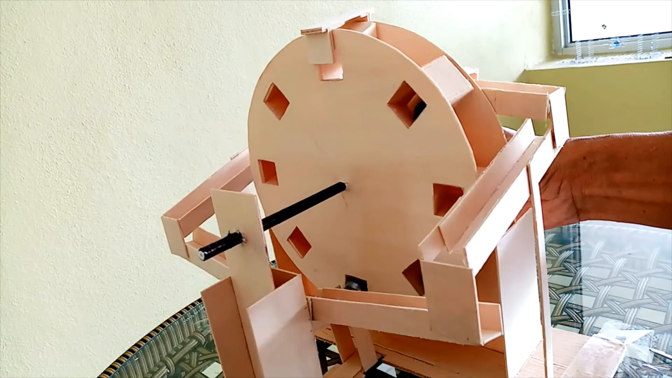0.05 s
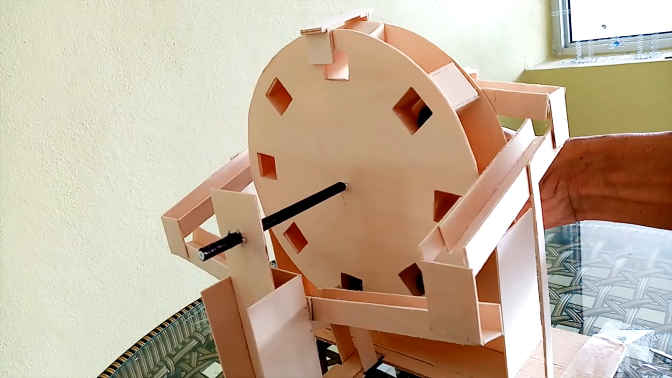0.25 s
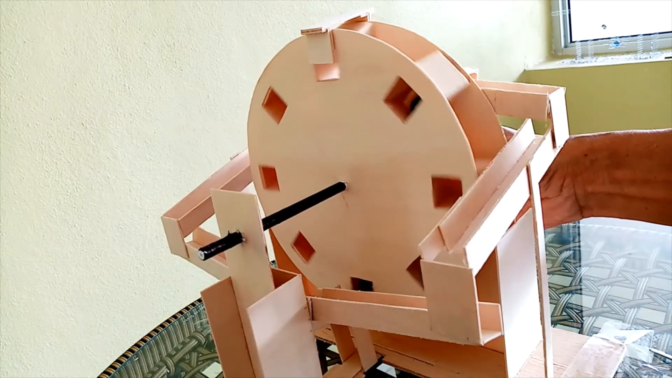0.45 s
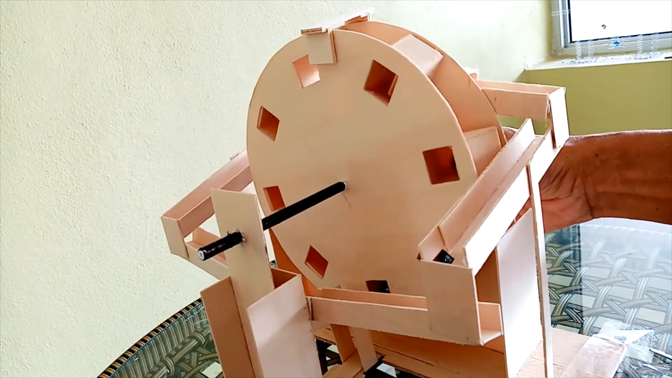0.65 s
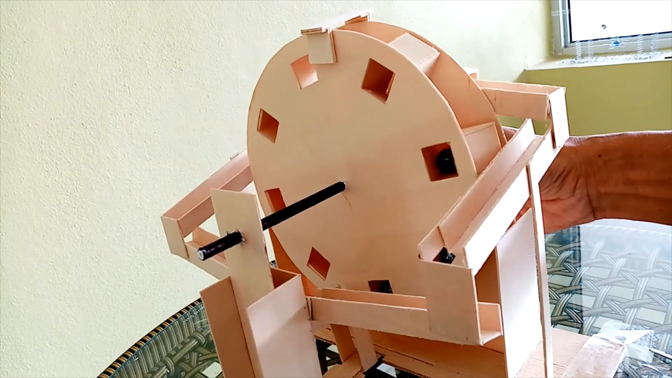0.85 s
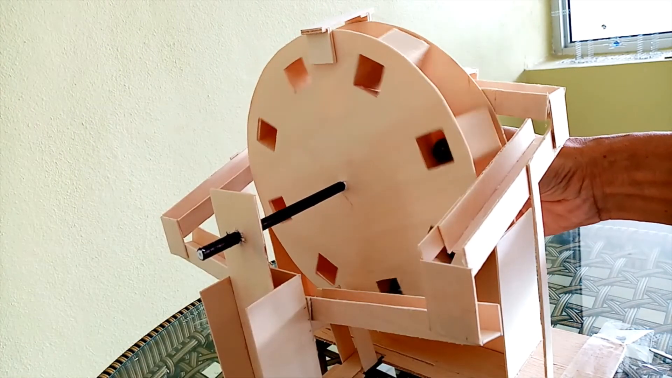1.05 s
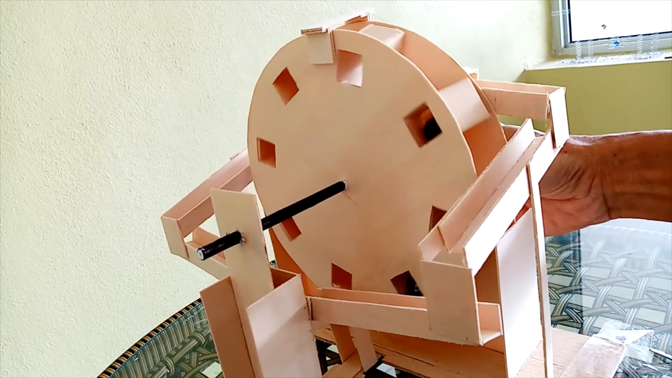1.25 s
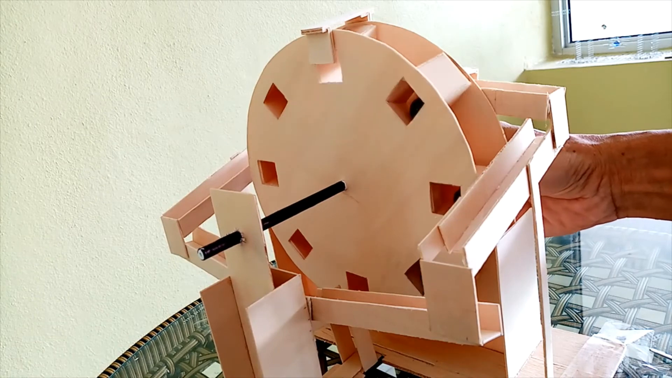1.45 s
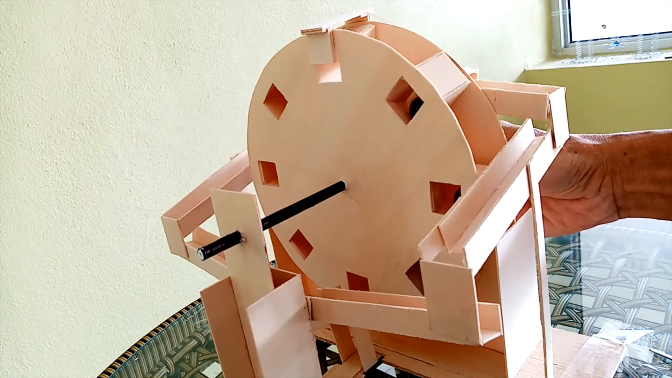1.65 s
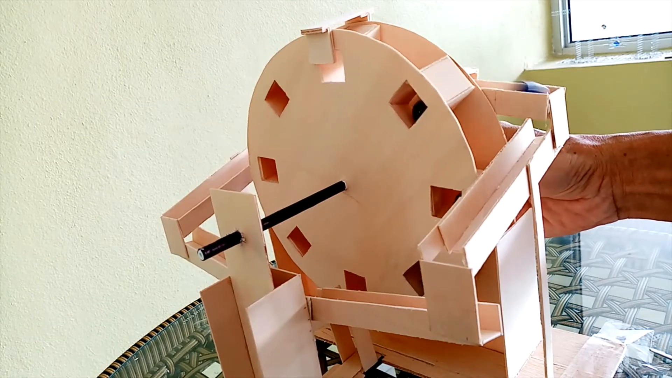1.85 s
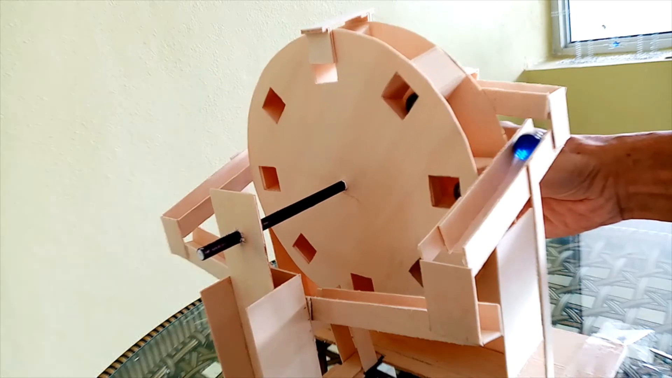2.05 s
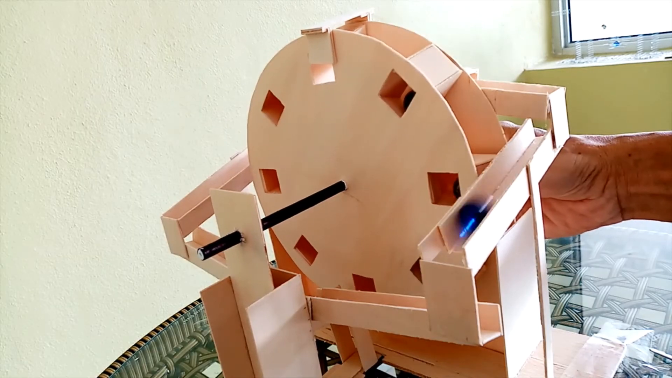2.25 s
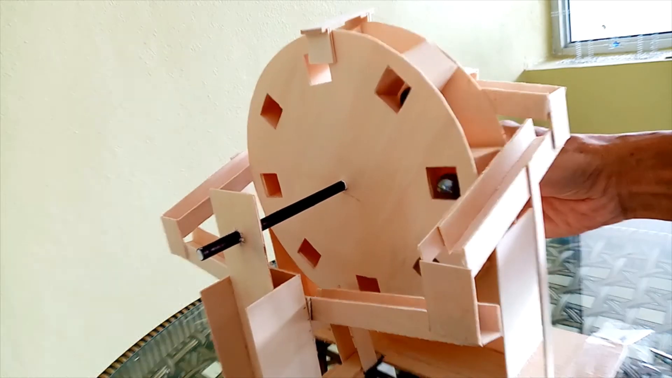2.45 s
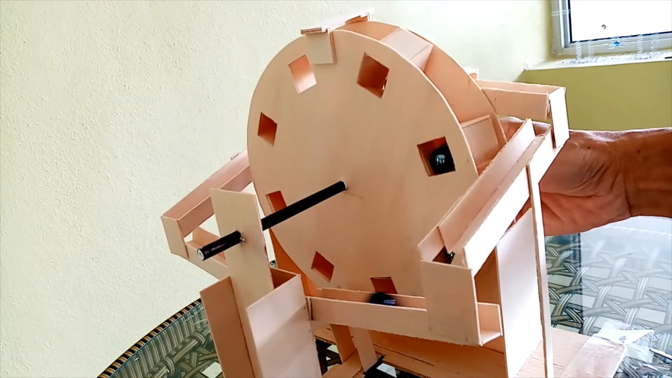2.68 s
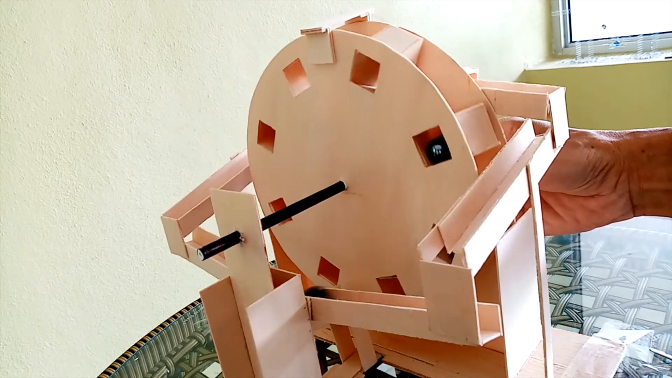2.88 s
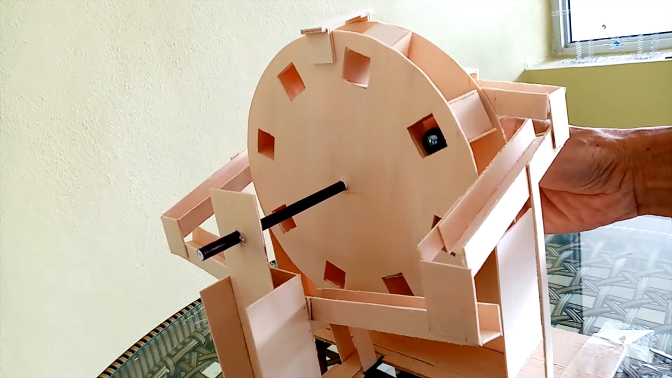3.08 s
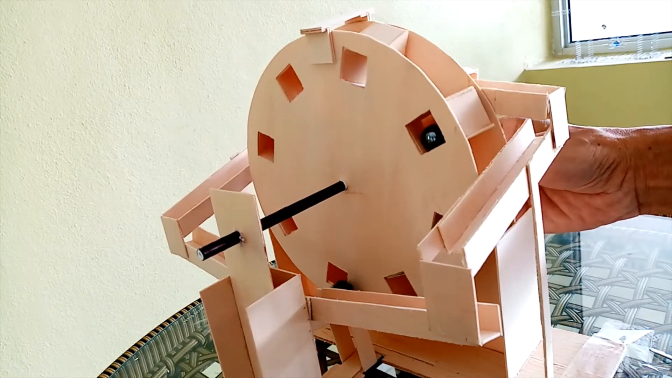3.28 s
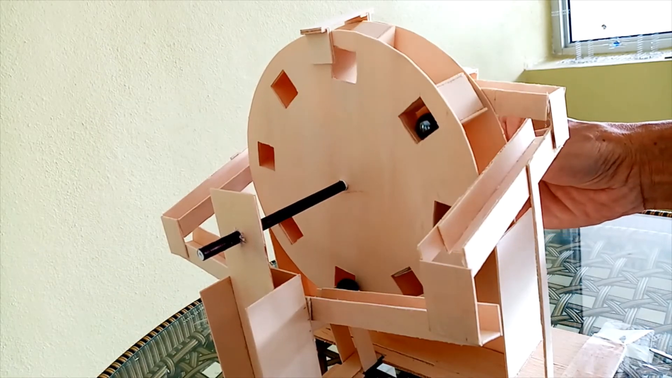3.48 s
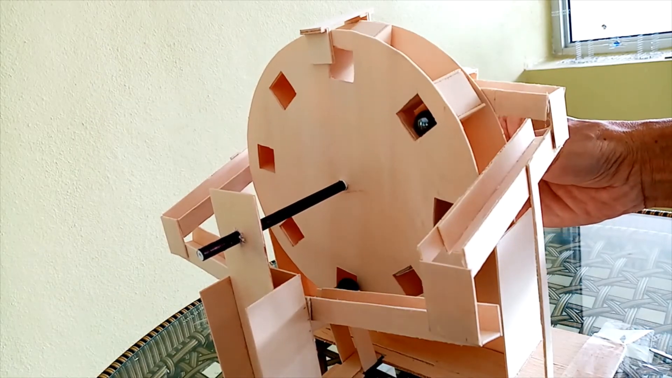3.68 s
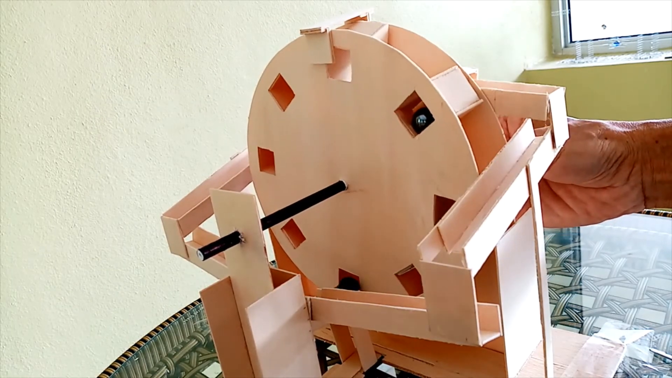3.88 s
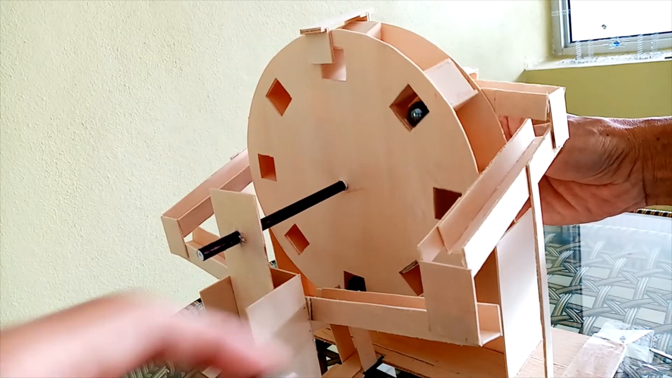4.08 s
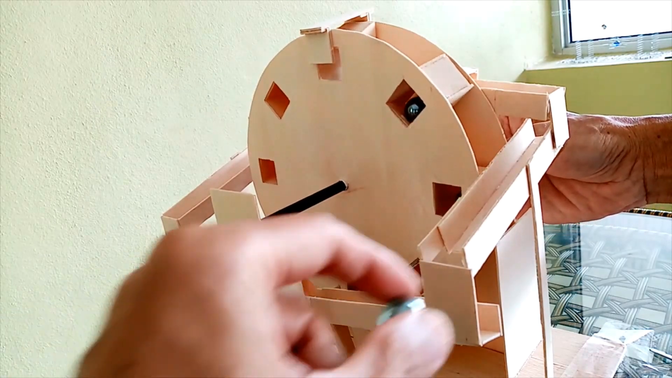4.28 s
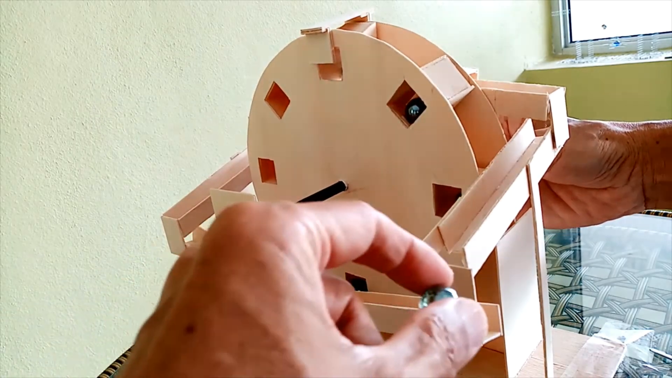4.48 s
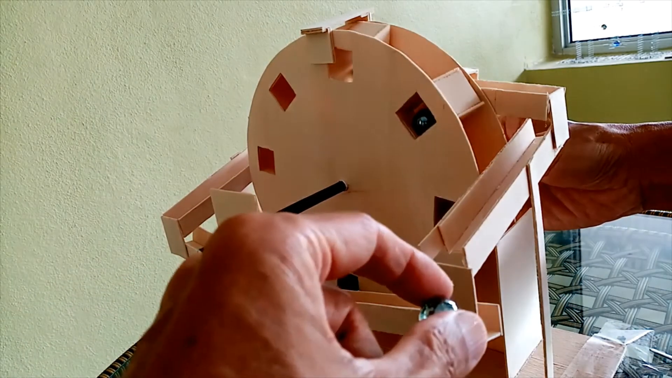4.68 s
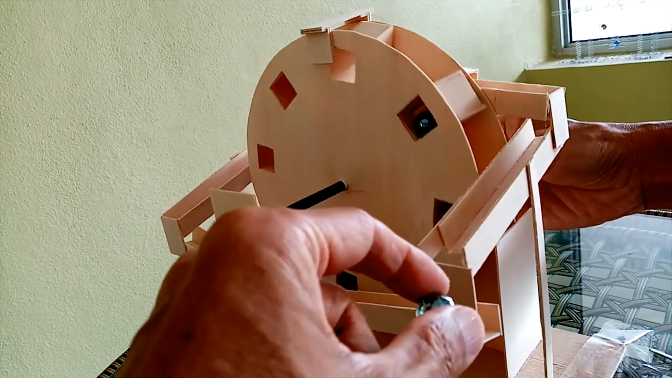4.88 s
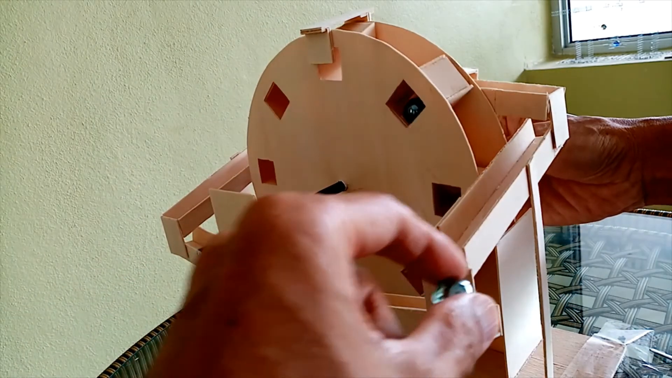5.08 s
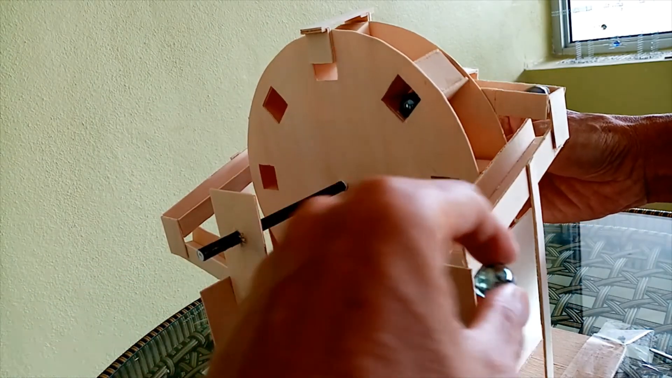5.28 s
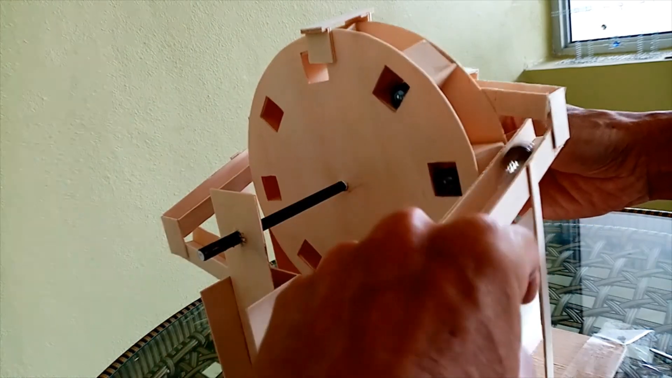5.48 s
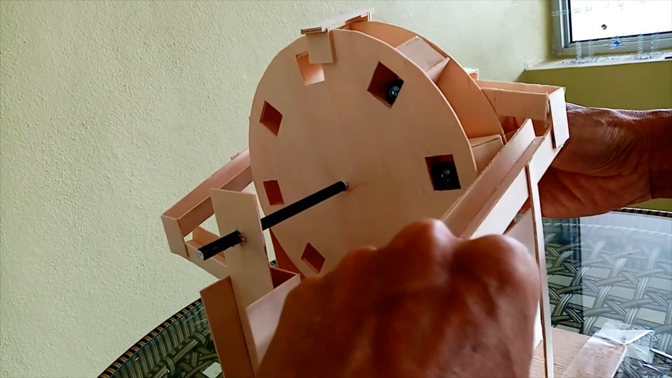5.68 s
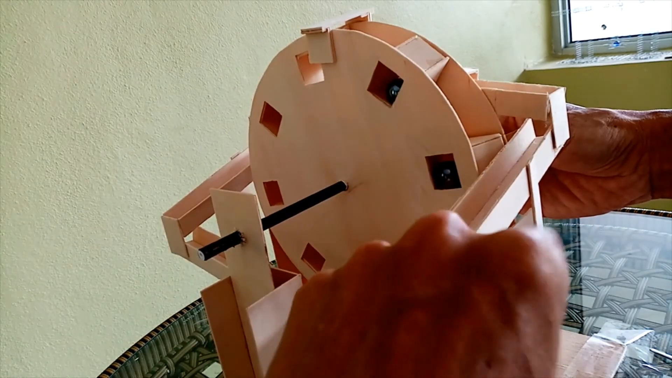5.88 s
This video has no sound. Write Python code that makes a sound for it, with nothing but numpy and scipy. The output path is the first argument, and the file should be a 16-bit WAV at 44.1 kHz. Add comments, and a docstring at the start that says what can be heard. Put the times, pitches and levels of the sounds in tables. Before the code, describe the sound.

Glass marbles travel through a hollow plywood toy in a bare, hard-walled room. A faint roll leads to a solid woody knock at 0.1 s, then a grainy roll fades, and a resonant double clack lands near 0.7 s. After a short lull, from 1.3 s, knocks and brief rolls crowd together: small rattling taps at 1.4, hard bright clacks near 1.9, 2.4 and 2.95, with low thumps of the frame beneath, ending on a clack at 3.25. Then mostly echo and quiet, with faint dull taps around 3.9, 4.1, 4.3 and 4.6 s. A soft roll starts at 4.6 and strong knocks return at 4.9, 5.1, 5.3 and 5.6 to 5.75, with rolling between and after, fading near 5.9. The close sound is dull on top, weighted left and compressed, so room echo blooms after hits. Faint low hum and hiss persist.

```python
"""Glass marbles run through a plywood toy with a hand-turned lifting wheel, in a bare, echoing room.
A marble rolls, then from 0.1 s each one drops, knocks on thin boards, rolls on and clacks into the next stop.
From 1.3 s to 3.3 s the knocks crowd together; a few faint ones follow, and after 4.7 s it gets busy again.
Noise bursts and short tones make the knocks, tiny bumps the rolling; a faint hum and hiss lie behind.
The close microphone is dull above 7 kHz; its compressor ducks hard knocks, so the echo swells up after them."""
import sys
import numpy as np
from scipy import signal
from scipy.fft import rfft, irfft, next_fast_len
from scipy.io import wavfile
from scipy.ndimage import uniform_filter1d, minimum_filter1d

SR = 44100
rng = np.random.default_rng(int(sys.argv[2]) if len(sys.argv) > 2 else 0)


def materialize(psi):
    """Save the field psi as 16-bit PCM at rate SR to the path in sys.argv[1].

    A 1-D psi becomes a single channel; in a 2-D psi each row is a channel.
    """
    bounded = np.clip(np.atleast_2d(psi).T, -1, 1)
    quanta = np.round(bounded * 32767).astype(np.int16)
    wavfile.write(sys.argv[1], SR, quanta)


N = 261513
THUMP_BELOW_HZ = 450   # frame modes below this pitch make thumps and rumble

# A marble strikes wood: (time [s], level before strike_db [dB], hardness of the contact as tilt [dB/octave],
# pitch of the struck board [Hz], how far that board stands out [dB], weight of the large low boards [dB])
KNOCKS = [(0.0816, -5.5, -6, 2200, 5, -3), (0.679, -17, -2, 1180, 4, 2), (0.6836, -16, -4, 2750, 10, 3),
          (0.6979, -27, -3, 2750, 14, -1), (1.325, -26.5, -15, 3160, 9, -1.5),
          (1.3741, -21.5, -15, 6650, 12, 7.5), (1.3855, -13, -0.5, 5390, 7, 2),
          (1.4001, -25, -2, 3400, 16, 10), (1.408, -18.5, -8, 4400, 15, 6),
          (1.4217, -21, -5, 1630, 13.5, 15), (1.8149, -16, -5.5, 2770, 5.5, 7.5),
          (1.8196, -12.5, -9.7, 965, 11.5, 4.5), (1.8293, -18, -12, 4740, 7, -4),
          (1.9043, -4, -3.5, 6340, 8, -6), (1.9376, -17.5, 5.5, 2040, 13, 15.5),
          (2.2673, -11.5, -2, 5400, 4, 2), (2.279, -21.5, -8.5, 1580, 9, 10),
          (2.2946, -21, -7, 3040, 13, 3), (2.3585, -5.5, 2, 6300, 4, 0), (2.4115, -24, 0.5, 3340, 5, 5),
          (2.6053, -12, -5, 2750, 8, -0.5), (2.6225, -21, -12, 1300, 8, 2), (2.6284, -23, -8, 940, 12.5, 5),
          (2.648, -18, -5, 1000, 5, 1), (2.8448, -9, 0.3, 5650, 4, -0.5), (2.8569, -23, -1, 5370, 12, -4),
          (2.8876, -22, 0.5, 3490, 6, 14), (2.9458, -5.5, -1.5, 4200, 6, -2),
          (2.991, -16, -5.5, 3180, 4.5, -10), (3.25, -11, -6, 2630, 11, -4), (3.9318, -22, -6, 1090, 13, 0),
          (4.06, -31, -10, 1050, 14, 0), (4.3277, -28, -9, 1050, 7, 4), (4.5609, -25.5, -3.5, 2750, 11, 0),
          (4.7246, -25, -12.5, 1710, 8, 12), (4.7713, -24.5, -12, 990, 17, -12),
          (4.7806, -14.5, -1, 2900, 4, 7), (4.805, -20.5, 0, 5200, 5, 4), (4.8793, -4.5, -6.5, 2200, 4, -4),
          (5.1089, -12, -3.5, 3700, 6, -9), (5.123, -24, -7, 3000, 4, -5), (5.2005, -13.5, -10, 5120, 4, 4),
          (5.2074, -14, -14, 1050, 12, -6), (5.215, -21, -12, 1100, 8, -6), (5.2874, -3.5, 0.5, 2000, 6, 3),
          (5.6256, -11, 1, 2160, 10.5, 9), (5.629, -12.5, -11.5, 5020, 7, 3.5),
          (5.657, -22, -4, 3810, 10, 11), (5.6982, -14, 2, 4700, 5, 0), (5.711, -21.5, -6, 2210, 8, 10),
          (5.7513, -8, 1, 3700, 7, 2)]


def knocks(scatter_s=0.0016, hard_db=-12, linger=0.49, rattle_s=0.0096, rattle_db=-17, board_octaves=0.3,
           strike_db=1.02, thump_db=-22, soft_above_hz=1560, thump_full_hz=202, size=8192):
    """Each blow scatters through the glued boards for a few ms and rings their resonances."""
    s, level_db, tilt_db, board_hz, board_db, body_db = np.transpose(KNOCKS)
    t, hz = np.arange(size) / SR, np.fft.rfftfreq(size, 1 / SR)

    # A hard blow is over at once; a gentle one chatters on the wood for longer.
    softness_db = np.clip(hard_db - level_db[:, None], 0, 14)
    chatter = np.exp(-t / (scatter_s * from_db(linger * softness_db)))
    spread = chatter + from_db(rattle_db) * np.exp(-t / rattle_s)
    noise = rng.standard_normal((len(s), 2, size)).swapaxes(0, 1)
    force = at_microphones(evened(rfft(noise * spread)), hz)

    # The struck board favours the modes near its own pitch; a soft contact loses the high ones.
    modes, mode_hz = frame_modes(hz), np.array(FRAME_MODES)[:, 0]
    near = np.exp(-(np.log2(mode_hz / board_hz[:, None]) / board_octaves) ** 2)
    octaves = np.log2(mode_hz / soft_above_hz)
    favour_db = board_db[:, None] * near
    favour_db = favour_db + tilt_db[:, None] * np.clip(octaves, 0, 2)
    favour_db = favour_db + body_db[:, None] * np.clip(-2 * octaves, 0, 1)
    boards = (from_db(favour_db) * (mode_hz >= THUMP_BELOW_HZ)) @ modes

    # The thump of the frame thins out towards the lowest bass.
    frame = (mode_hz < THUMP_BELOW_HZ) @ modes * np.minimum(hz / thump_full_hz, 1) ** 2
    knock = at_level(force * boards, level_db + strike_db, size)
    thump = at_level(force * frame, level_db + thump_db + strike_db, size)
    return placed(s, knock + thump, size)


# Short resonances colour the hard knocks; the 10500 Hz row is a brief burst of treble at a loud knock:
# (time [s], pitch [Hz], direct level [dB], decay time to -60 dB [s],
# level sent into the room, relative to the direct level [dB])
CLACKS = [(0.68, 620, -21, .015, -3), (0.683, 1190, -16, .015, -13), (0.683, 2150, -16, .008, -10),
          (0.684, 2740, -11, .024, -6), (1.386, 1050, -18, .03, -2), (1.386, 5450, -17, .003, 3),
          (1.905, 1550, -11, .018, -3), (1.905, 5160, -9, .009, -3), (1.905, 10500, -9, .001, -15),
          (2.268, 1150, -14, .02, -5), (2.268, 2320, -12.5, .014, -6), (2.36, 1060, -9, .03, -6),
          (2.36, 2600, -14, .012, 2), (2.36, 3330, -1, .012, -8), (2.36, 4130, -13, .018, 0),
          (2.36, 5770, -11, .012, 0), (2.412, 3330, -19, .012, -3), (2.845, 3700, -15, .012, -5),
          (2.845, 5400, -19, .008, 5), (2.946, 3300, -7, .01, -7), (2.946, 5400, -8, .008, -1),
          (3.25, 1170, -16, .025, -5), (3.25, 2250, -12, .007, 1), (3.25, 2850, -17, .006, 7),
          (4.781, 5650, -17, .006, 1), (5.109, 1500, -15, .012, -5), (5.109, 2200, -12.5, .01, -7),
          (5.288, 5000, -9, .007, -7), (5.288, 6500, -6, .01, -4), (5.699, 3200, -15, .008, -7),
          (5.752, 3250, -13, .012, -8)]


def clacks(rise_s=0.0006, size=8192):
    """Short decaying tones on the hard knocks: what is heard directly, and what is sent into the room."""
    s, hz, level_db, t60, echo_db = np.transpose(CLACKS)[:, :, None]
    t = np.arange(size) / SR
    decay = from_db(-np.minimum(60 * t / t60, 200))
    spectra = rfft((1 - np.exp(-t / rise_s)) * decay * np.sin(2 * np.pi * hz * t))[None]
    direct = placed(s[:, 0], at_level(spectra, level_db[:, 0], size), size)
    to_room = placed(s[:, 0], at_level(spectra, (level_db + echo_db)[:, 0], size), size)
    return direct, to_room


# Narrow tones linger after some blows: (time [s], pitch [Hz], level [dB], decay time to -60 dB [s])
LINGERING_TONES = [(0.684, 2707, -32, .6), (0.684, 2815, -35, 0.4), (1.905, 5162, -33, .7),
                   (2.359, 3203, -31, .5), (2.359, 3375, -32, .5), (2.359, 4096, -33, .65),
                   (2.359, 5765, -33, .65), (2.946, 5356, -32, .8), (2.946, 5431, -31, .8),
                   (3.25, 2099, -33, .6), (3.25, 2777, -33, .6), (3.932, 1076, -39, .8),
                   (4.565, 1679, -39, 1.2), (4.565, 1932, -39, 1.2), (5.288, 6626, -34, .55),
                   (5.288, 6723, -35, .55)]


def lingering_tones(rise_s=0.004):
    """Narrow tones linger after some blows, each a slowly dying ring of its own; a weaker copy also goes into
    the room."""
    return sum(struck(s, hz, db, t60, rise_s) for s, hz, db, t60 in LINGERING_TONES)


# A marble lands with its full weight and drums the frame:
# (time [s], sway in the lowest mode [dB], boom in the mode near 300 Hz [dB]), both before drum_db
LANDINGS = [(1.41, -51, -15.5), (1.825, -27, -19), (1.925, -25.5, -21), (2.275, -40, -17.5),
            (2.385, -25, -26), (2.959, -32, -36), (3.26, -38, -45), (4.7814, -44, -23), (5.214, -29, -26),
            (5.305, -27, -22), (5.645, -32.5, -18), (5.775, -30, -23)]
# The frame's two low modes: (pitch before detuning [Hz], decay time to -60 dB [s])
DRUM_MODES = [(92, 0.84), (301, 0.34)]


def swaying(rise_s=0.0068, drum_db=-5, detune=0.013):
    """The weight of a landing marble pushes the frame's two low modes, a little differently each time."""
    spots = rng.standard_normal((len(LANDINGS), len(DRUM_MODES)))
    shifts = 1 + detune * np.clip(spots, -1.5, 1.5)
    out = 0
    for (s, *levels_db), row in zip(LANDINGS, shifts):
        for (hz, t60), db, shift in zip(DRUM_MODES, levels_db, row):
            out = out + struck(s, hz * shift, db + drum_db, t60, rise_s)
    return out


# A marble rolls along a runway or settles in a pocket of the wheel:
# (start [s], end [s], level at the start [dB], dying away [dB/s], brightest pitch [Hz],
# fall to either side [dB/octave], rumble of the frame at the start [dB], pitch of the rumble [Hz])
ROLLS = [(0.0, 0.061, -34.5, 1, 2400, 7, -55, 200), (0.103, 0.36, -30, 18.5, 1400, 7, -37, 370),
         (0.38, 0.665, -45, 0, 1310, 12, -56, 300), (1.39, 1.56, -35, 35, 1500, 4, -36, 200),
         (1.565, 1.806, -38.5, -2, 980, 10, -52, 200), (1.825, 1.91, -34.5, 20, 600, 10, -33, 180),
         (1.93, 2.264, -31.5, 18, 1500, 7, -42, 220), (2.28, 2.36, -34, 20, 600, 10, -34, 220),
         (2.39, 2.6, -26.5, 28, 3500, 3, -39, 220), (2.875, 2.95, -35.5, 0, 1000, 10, -33, 160),
         (2.96, 3.22, -28, 35.5, 2000, 14, -37, 170), (4.57, 4.787, -34, -1, 1800, 28, -48, 190),
         (4.8, 4.88, -29, 0, 1300, 5, -37, 210), (4.91, 5.1, -27, 20, 1900, 3.5, -39, 300),
         (5.215, 5.29, -33, 10, 600, 8, -36, 210), (5.313, 5.612, -29.5, 27, 2200, 4, -37, 230),
         (5.782, 5.934, -28.5, 12, 5000, 6, -41, 300)]


def rolling(fade_s=0.015, rumble_slope_db=8, size=22050):
    """Wood grain makes dense small bumps that ring the boards; slower jolts make the frame rumble."""
    out, t = np.zeros(N + size), np.arange(size) / SR
    modes, mode_hz = frame_modes(np.fft.rfftfreq(size, 1 / SR)), np.array(FRAME_MODES)[:, 0]
    for start, end, level_db, slowing_db, bright_hz, slope_db, rumble_db, rumble_hz in ROLLS:
        runway = from_db(-slope_db * abs(np.log2(mode_hz / bright_hz))) @ modes
        low_modes = from_db(-rumble_slope_db * abs(np.log2(mode_hz / rumble_hz)))
        frame = ((mode_hz < THUMP_BELOW_HZ) * low_modes) @ modes
        grain = rms_one(irfft(bumps(per_s=450, size_db=4.5, size=size) * runway, size))
        rumble = rms_one(irfft(bumps(per_s=120, size_db=3, size=size) * frame, size))
        fade = np.clip(np.minimum(t, end - start - t) / fade_s, 0, 1) * from_db(-slowing_db * t)
        first = int(start * SR)
        out[first:first + size] += (from_db(level_db) * grain + from_db(rumble_db) * rumble) * fade
    return out[:N]


def bumps(per_s, size_db, size):
    """Spectrum of a run of uneven little bumps at random moments."""
    sizes = from_db(size_db * np.minimum(rng.exponential(1, size), 3))
    sizes = sizes * rng.choice([-1, 1], size)
    return rfft(sizes * (rng.random(size) < per_s / SR))


# Resonances of the plywood frame: (pitch [Hz], width [Hz], level [dB])
FRAME_MODES = [(97, 16, -6.5), (124.2, 16, -6.5), (171.2, 13, -10.5), (233, 21, -6), (304.7, 24, -3.5),
               (377, 92, -10.5), (536.6, 71, -4.5), (644, 108, -5.5), (820, 65, -0.74), (914, 70, -0.2),
               (1086, 97, 2.54), (1249, 112, 0.5), (1375, 133, -2), (1600, 98, 1.6), (1890, 224, 0),
               (2327, 343, 0.7), (2727, 153, 4), (2980, 140, 0.1), (3314, 278, -0.6), (3750, 385, -2.3),
               (4150, 360, -2.5), (4750, 510, -4), (5190, 295, 2.5), (5480, 277, 1), (5770, 316, 1.5),
               (6500, 470, -2.5), (7090, 540, -7.7), (8640, 1060, -14.5), (11100, 1700, -25),
               (14000, 1500, -29)]


def frame_modes(hz):
    """Response of each resonance, one row a mode, with alternating signs."""
    centre, width, db = np.transpose(FRAME_MODES)[:, :, None]
    sign = (-1) ** np.arange(len(FRAME_MODES))[:, None]
    return sign * from_db(db) * 1j * hz * width / (centre ** 2 - hz ** 2 + 1j * hz * width)


# How long the room rings: (pitch [Hz], decay time to -60 dB [s])
ROOM_T60 = [(90, 0.1), (260, 1), (900, 1.02), (2000, 1.16), (3600, 0.98), (5800, 0.96), (12000, .5)]
# How loud the room is: (pitch [Hz], echo energy against the direct sound [dB])
ROOM_DB = [(90, 4.5), (160, 1), (260, -1), (900, -4.5), (2000, -7), (3600, -6), (6500, -9), (9500, -8.5),
           (14000, -21.5)]


def room(x, first_wall_s=0.0034, build_s=0.0025):
    """Dense echoes from hard walls, dying away at their own pace in each half octave."""
    t = np.arange(SR * 3 // 2) / SR
    noise, hz = diffuse(len(t))
    onset = 1 - np.exp(-np.maximum(t - first_wall_s, 0) / build_s)
    edges = np.geomspace(45, 18000, 18)
    echoes = 0
    for low, high in zip(edges, edges[1:]):
        centre = np.sqrt(low * high)
        decay = onset * from_db(-60 * t / at_hz(ROOM_T60, centre))
        band = irfft(noise * ((hz >= low) & (hz < high)), len(t))
        echoes = echoes + band * decay / np.linalg.norm(decay) * from_db(at_hz(ROOM_DB, centre))
    return signal.fftconvolve(x[None], echoes, axes=1)[:, :N]


# A faint hum in the background: (time [s], pitch before the waver [Hz], level [dB])
HUM = [(0, 159.2, -55), (0.5, 160, -48), (1.0, 165.2, -52), (2.2, 170, -48), (3.2, 171.7, -57),
       (3.7, 175.6, -48), (4.2, 178.6, -61)]


def hum(waver_hz=2.57, size=40):
    """A faint low hum: a sine that creeps up in pitch and wavers at random."""
    t, (s, hz, db) = np.arange(N) / SR, np.transpose(HUM)
    waver = np.interp(t, np.linspace(0, t[-1], size), rng.standard_normal(size))
    turns = np.cumsum(np.interp(t, s, hz) + waver_hz * waver) / SR
    return np.sqrt(2) * from_db(np.interp(t, s, db)) * np.sin(2 * np.pi * turns)


# Colour of the room's steady hiss: (pitch [Hz], relative level per Hz [dB])
HISS = [(25, -25), (48, -22), (70, -5.5), (100, -5), (170, -2), (260, -0.5), (400, -5.5), (1050, -2.3),
        (1500, -6), (2700, -5), (4300, -15.5), (5600, -14.5), (6600, -20), (7400, -39), (9000, -72),
        (16000, -43)]


def hiss(level_db=-33.5):
    """The even background of the room: noise shaped to a fixed colour."""
    size = next_fast_len(N)
    noise, hz = diffuse(size)
    return from_db(level_db) * rms_one(irfft(noise * from_db(at_hz(HISS, hz)), size)[:, :N])


def diffuse(size):
    """Spectra of white noise arriving from all sides at the two microphones, and their frequencies."""
    hz = np.fft.rfftfreq(size, 1 / SR)
    return at_microphones(rfft(rng.standard_normal((2, size))), hz), hz


# How alike the two microphones hear diffuse sound: (pitch [Hz], likeness [1 = the same])
LIKENESS = [(25, 0.7), (70, 0.96), (250, 0.85), (600, 0.5), (1200, 0.23), (3000, 0.02), (8000, -0.07)]


def at_microphones(spectra, hz):
    """Mix two unrelated spectra into what left and right microphones hear: alike in the bass, less so above."""
    alike = np.clip(at_hz(LIKENESS, hz), 0, 0.99)
    return np.array([spectra[0], alike * spectra[0] + np.sqrt(1 - alike ** 2) * spectra[1]])


def from_db(db):
    """Decibels to gain."""
    return 10 ** (np.asarray(db) / 20)


def rms_one(x):
    """Scale to unit rms."""
    return x / np.sqrt(np.mean(x ** 2) + 1e-20)


def at_hz(points, hz):
    """Read a spectrum on a log-frequency axis."""
    known_hz, value = np.transpose(points)
    return np.interp(np.log(np.maximum(hz, 1)), np.log(known_hz), value)


def evened(spectra, size=130):
    """Level out broad humps in a force spectrum, so that the boards set the colour."""
    return spectra / np.sqrt(uniform_filter1d(abs(spectra) ** 2, size, axis=-1) + 1e-12)


def at_level(spectra, level_db, size):
    """Scale each blow so that its energy, packed into 10 ms, has the given level."""
    level = np.sqrt(2 * np.sum(abs(spectra) ** 2, axis=-1) / size / (0.01 * SR))
    return spectra * (from_db(level_db) / level)[..., None]


def placed(times, spectra, size):
    """Lay blows out in time on both channels, each faded out at its end."""
    out = np.zeros((2, N + size))
    fade = np.clip(np.linspace(4, -1, size), 0, 1)
    for s, blow in zip(times, irfft(spectra, size).swapaxes(0, 1)):
        start = round(s * SR)
        out[:, start:start + size] += blow * fade
    return out[:, :N]


def struck(s, hz, level_db, t60, rise_s):
    """One tone that swells briefly and dies away; the level is the rms its decay starts from."""
    t = np.maximum(np.arange(N) / SR - s, 0)
    decay = from_db(level_db - np.minimum(60 * t / t60, 200))
    return np.sqrt(2) * decay * (1 - np.exp(-t / rise_s)) * np.sin(2 * np.pi * hz * t)


# How much weaker the right channel is: (pitch [Hz], left minus right [dB])
BALANCE_DB = [(60, 6.1), (170, 7.4), (320, 10.5), (700, 13.9), (1400, 14.8), (2800, 13.3), (5600, 7.9),
              (11000, 5.4)]


def scene(tone_echo_db=-8, right_lag_s=0.000872):
    """Toy and room; the right channel is weaker than the left and lags by about 0.9 ms."""
    tones = lingering_tones()
    clack, clack_to_room = clacks()
    toy = knocks() + rolling()
    sent = toy + clack_to_room + from_db(tone_echo_db) * tones
    # Each side of the toy radiates to other walls.
    echoes = (room(sent[0]) + room(sent[1])) / np.sqrt(2)
    left, right = toy + clack + tones + echoes + swaying() + hum() + hiss()

    size = next_fast_len(N + SR // 10)
    hz = np.fft.rfftfreq(size, 1 / SR)
    weaker_later = from_db(-at_hz(BALANCE_DB, hz)) * np.exp(-2j * np.pi * hz * right_lag_s)
    return np.array([left, irfft(rfft(right, size) * weaker_later, size)[:N]])


def hold(db, db_per_s):
    """Peaks of a level, each falling away at a steady rate."""
    fall = db_per_s * np.arange(N) / SR
    return np.maximum.accumulate(db + fall) - fall


def compress(x, threshold_db=-12, share=0.61, release_db_per_s=190, attack_db_per_s=700, window_s=0.0022):
    """Follow the louder left channel, duck both just before a knock and let go at a steady rate."""
    window = int(window_s * SR)
    level_db = 10 * np.log10(np.maximum(uniform_filter1d(x[0] ** 2, window), 1e-12))
    excess_db = np.maximum(level_db - threshold_db, 0) * share
    released_db = hold(excess_db, release_db_per_s)
    # Run backwards in time, the same hold makes the ducking start ahead of the knock.
    duck_db = hold(released_db[::-1], attack_db_per_s)[::-1]
    return x * from_db(-uniform_filter1d(duck_db, window))


def limit(x, ceiling=0.92, window_s=0.0015):
    """A quick limiter rounds off what peaks the compressor lets through."""
    window = int(window_s * SR)
    gain = np.minimum(ceiling / (abs(x).max(axis=0) + 1e-9), 1)
    return x * uniform_filter1d(minimum_filter1d(gain, window), window)


def record(dry, treble_hz=7000, leak_db=-20, cutoff_hz=16500):
    """The treble drops steeply to a faint shelf, knocks are compressed, peaks limited and the top is cut."""
    low_pass = signal.butter(14, treble_hz, fs=SR, output="sos")
    dull = signal.sosfilt(low_pass, dry) + from_db(leak_db) * dry
    top_cut = signal.ellip(10, 0.1, 80, cutoff_hz, fs=SR, output="sos")
    return signal.sosfilt(top_cut, limit(compress(dull)))


dry = scene()
out = record(dry)
materialize(out)
```